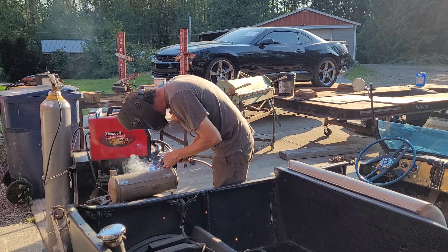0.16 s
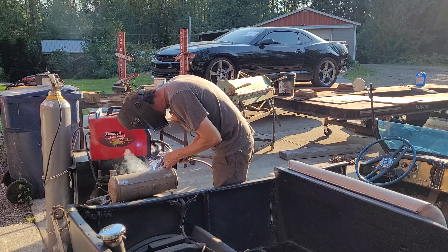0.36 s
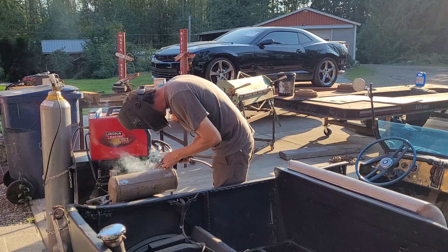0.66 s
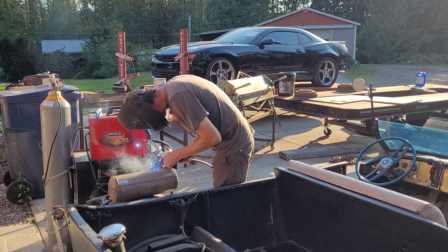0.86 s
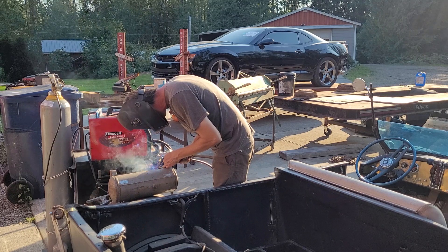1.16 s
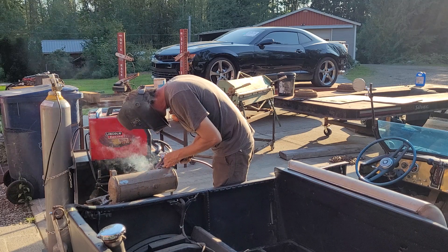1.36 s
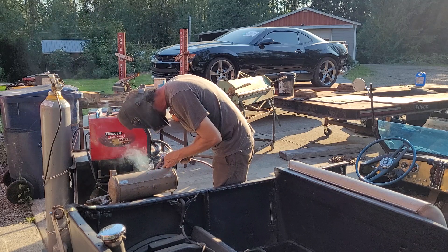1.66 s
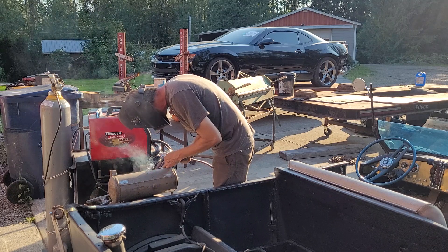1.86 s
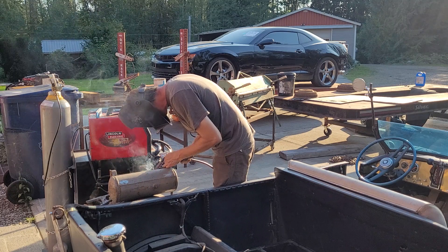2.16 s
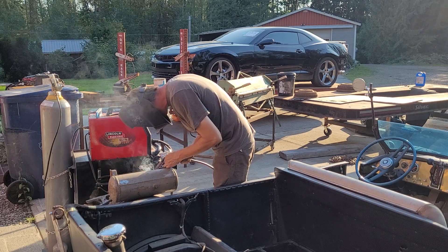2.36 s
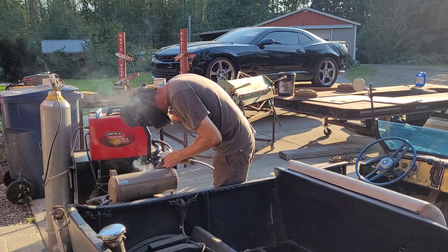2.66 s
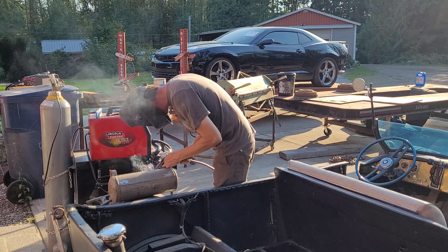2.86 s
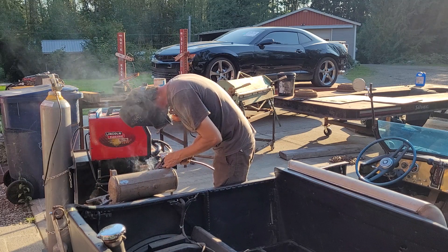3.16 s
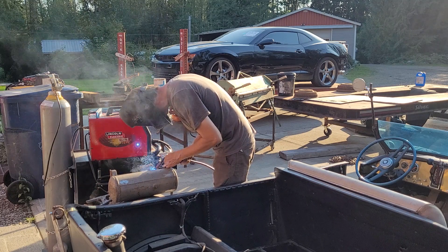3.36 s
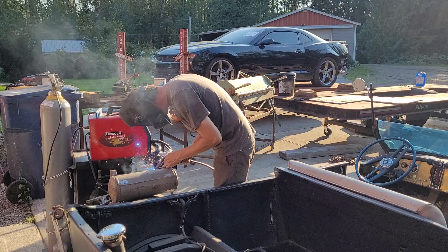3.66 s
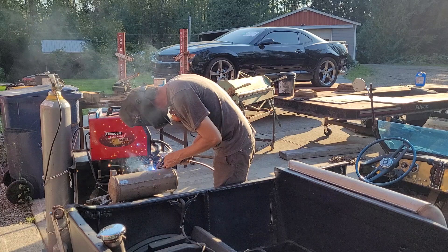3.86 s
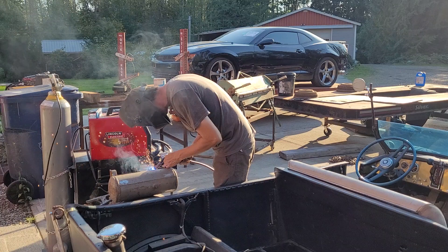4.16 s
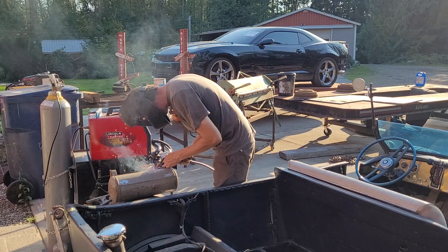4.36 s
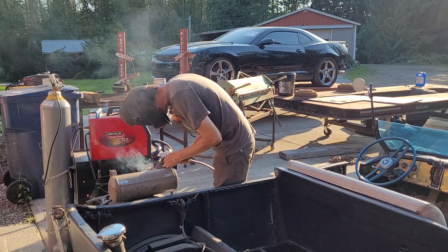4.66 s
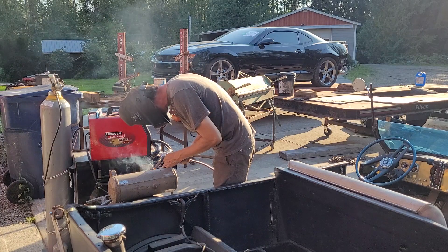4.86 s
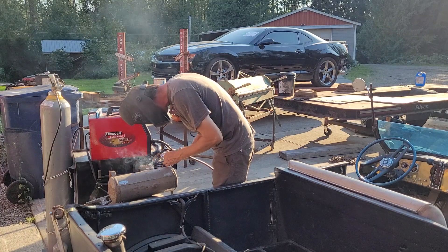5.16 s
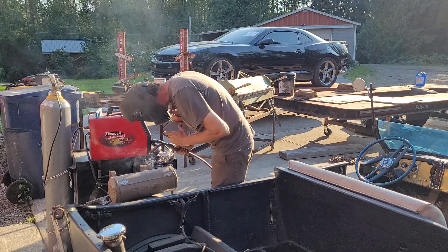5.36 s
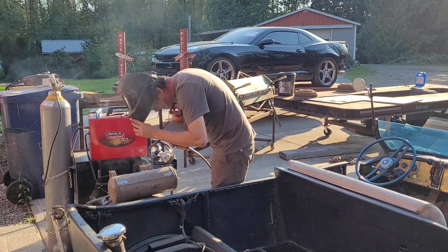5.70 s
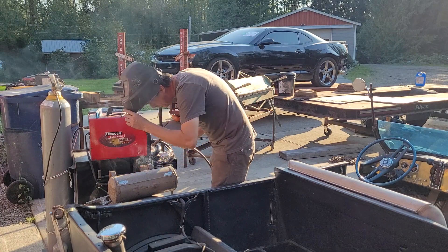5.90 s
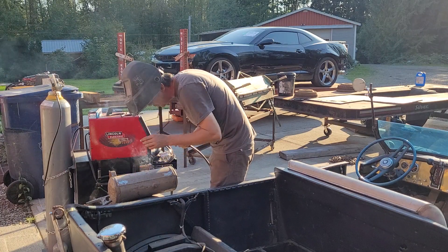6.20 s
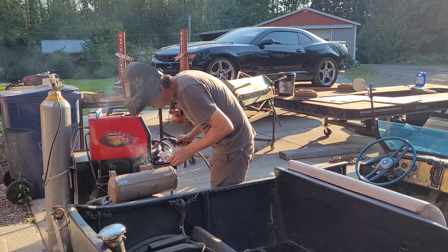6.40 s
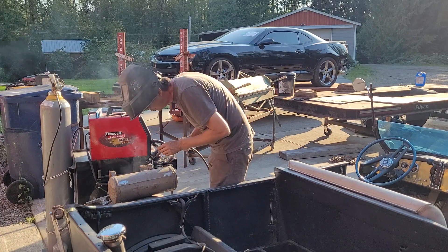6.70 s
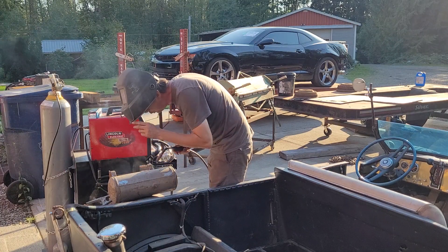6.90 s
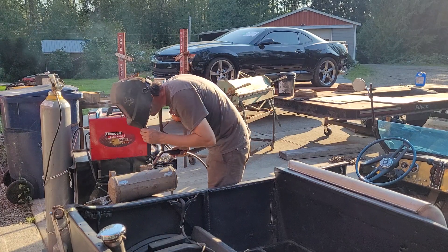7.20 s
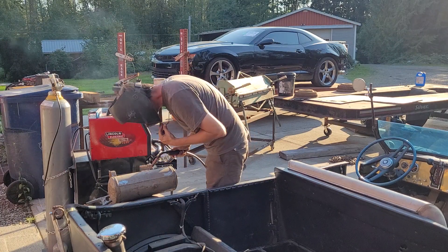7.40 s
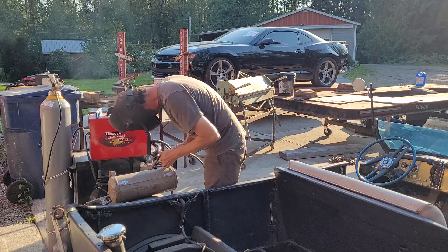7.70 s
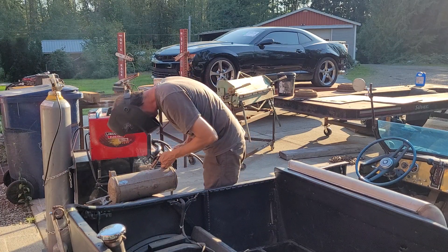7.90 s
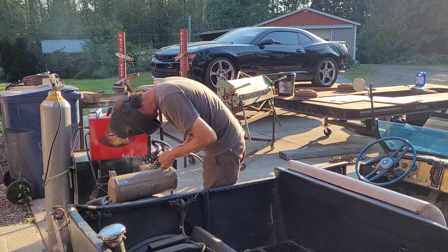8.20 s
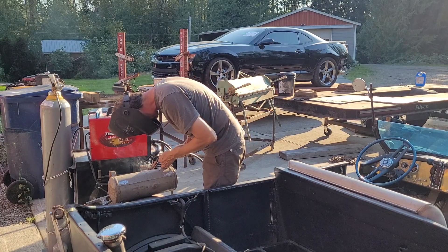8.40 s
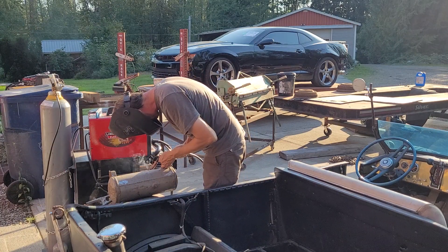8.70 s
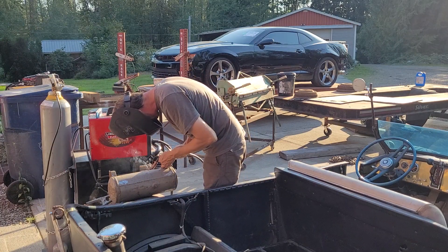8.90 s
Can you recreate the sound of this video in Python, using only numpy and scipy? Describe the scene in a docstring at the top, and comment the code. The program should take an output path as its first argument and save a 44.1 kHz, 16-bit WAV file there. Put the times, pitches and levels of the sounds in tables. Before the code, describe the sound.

Rapid, sharp pops over a bright hiss come from a wire-feed welder working on steel: a short run, a quick tack, then a trigger click and a longer run. A fan hum and a low engine drone continue beneath, with a faint bird in the gap. After the welding, the engine slows and its exhaust swells and eases before a last click. It is heard from nearby, outdoors, with little echo.

```python
"""Wire-feed welding in a yard

Two beads and a short tack on a steel tank: the wire shorts and pops about ninety times a second
over the hiss of the arc; the tank rings and clutter scatters the sound. The trigger clicks the gas
on, and the welder's fan sags as feed motor and arc load the supply. Nearby an engine runs, drops
to idle and booms for a while; a bird calls faintly."""
import sys
import numpy as np
from scipy import signal
from scipy.fft import rfft, irfft
from scipy.io import wavfile

SR = 44100
rng = np.random.default_rng(int(sys.argv[2]) if len(sys.argv) > 2 else 0)


def wav_out(sig):
    """Save sig, one row per channel (or a flat mono array), as 16-bit PCM at SR to the path in sys.argv[1]."""
    wavfile.write(sys.argv[1], SR, np.round(np.clip(np.atleast_2d(sig).T, -1, 1) * 32767).astype(np.int16))


N = 399105
TIME = np.arange(N) / SR

# bead, tack, bead, one curve each: t/s, shorting rate/Hz, pop level/dB, hiss level/dB
WELDS = [
    [(0, 58, -20, -29.5), (.09, 64, -16.5, -33.5), (.18, 89, -20, -33.5), (.29, 74.5, -20.5, -34),
     (.41, 61, -23.5, -40), (.48, 117, -25.5, -34.5), (.65, 108, -18, -42), (.75, 98, -19.5, -34.5),
     (.826, 51.5, -20.5, -44)],
    [(1.232, 84, -19, -31.5), (1.305, 115, -19.5, -27.5)],
    [(3.515, 49.6, -18.5, -25.5), (3.62, 173, -18, -27), (3.69, 61.7, -14, -32), (3.84, 140, -17, -27),
     (3.9, 33.3, -17, -27.5), (3.97, 40.7, -19.5, -31), (4.07, 90, -16.5, -37), (4.2, 92, -16, -32),
     (4.3, 91, -19, -32), (4.37, 114, -22, -32), (4.558, 106, -20.5, -31)],
]
# arc and gas hiss spectrum: f/Hz, relative level/dB
HISS_SPECTRUM = [(100, -12), (1000, -15), (1900, -7), (3200, -6), (4500, 2), (6200, -3), (8700, -5),
                 (11800, 2.5), (13300, 1.5), (15500, 5.5)]
# thump and knock spectrum: f/Hz, relative level/dB
THUMP_SPECTRUM = [(100, -9.5), (300, 0), (650, -15.5), (1000, -3), (1450, 4), (1850, 1), (2400, 0),
                  (3300, -8.5), (6000, -5.5), (15000, -19.5)]
# exhaust boom: t/s, level/dB, centre f/Hz
BOOM = [(0, -65, 144), (2.2, -68.5, 146.4), (4.9, -58, 116.6), (5.5, -53, 124.3), (5.93, -47.5, 130),
        (6.1, -41.5, 143), (6.32, -45, 104.5), (6.58, -38.5, 116), (6.8, -35, 155), (7.3, -31.5, 144),
        (7.67, -40, 141.4), (7.8, -39, 139.3), (8.05, -46, 136.2), (8.45, -48.5, 133), (8.8, -45.5, 140)]
# engine and fan air: t/s, low-band level/dB, high-band level/dB
AIR_LEVELS = [(2.3, -55.5, -81.5), (2.7, -51.5, -76.5), (3.2, -51.5, -76), (4.8, -59, -83),
              (5.3, -59.5, -82), (5.9, -51, -70), (7.1, -50, -68.5), (8.8, -51, -69.5)]


def arc(short_s=0.0028, short_db=-15, hiss_db=-6, flutter_db=1.3):
    """The arc hisses, falls nearly silent while the wire is shorted, then blows free with a pop."""
    times, levels_db = shorts()
    rate_hz, _, hiss_gain = weld_curves()
    next_pop_s = np.append(times, np.inf)[np.searchsorted(times, TIME)]
    shorted = next_pop_s - TIME < short_s
    burn = (hiss_gain + flares()) * from_db(short_db * shorted)
    hiss = burn * from_db(hiss_db + flutter_db * drift(120)) * rng.standard_normal(N)
    pops = impulses(times, levels_db)
    body = thumps(times, levels_db) + cold_strike(pops, rate_hz == 0) + tank(pops)
    return cracks(pops) + body + colour(hiss, HISS_SPECTRUM)


def shorts(overdue_beats=0.35, jitter_beats=0.06, spread_db=1.5):
    """Pop times and levels: the wire dips steadily; each loud pop comes late and restarts the beat."""
    # wire strikes, or stubs and blows free: t/s, level/dB
    loud_pops = [(0.0023, -14), (0.0224, -13.5), (0.0378, -14), (0.055, -17.5), (0.0701, -14.5),
                 (0.09, -13), (0.1078, -13.5), (0.3057, -15.5), (0.338, -16.5), (0.3534, -18),
                 (0.384, -17.5), (0.602, -13), (0.6308, -17.5), (0.65, -17), (0.803, -14), (0.8233, -16),
                 (1.0074, -23), (1.0681, -21.5), (1.2331, -12.5), (1.2484, -9), (1.2694, -12.5),
                 (1.2891, -14.5), (1.2984, -11.5), (3.3764, -13), (3.516, -13.5), (3.553, -19),
                 (3.672, -13), (3.7142, -11.5), (3.7422, -12), (3.7612, -12), (3.8027, -14.5), (3.868, -18),
                 (3.8991, -12.5), (3.9165, -10.5), (3.9498, -11), (3.986, -12.5), (4.0064, -10.5),
                 (4.0248, -15), (4.0529, -13), (4.1692, -17), (4.1803, -15), (4.2255, -13), (4.2359, -14),
                 (4.2484, -14), (4.2655, -16.5), (4.2842, -11.5), (4.3075, -14), (4.326, -13),
                 (4.4096, -15), (4.5543, -14.5)]
    loud_s, loud_db = np.transpose(loud_pops)
    rate_hz, pop_db, _ = weld_curves()
    dips = np.cumsum(rate_hz) / SR
    restarts = np.interp(loud_s, TIME, dips)
    beats = np.concatenate([np.linspace(a, b, max(round(b - a), 1) + 1)[1:-1]
                            for a, b in zip(restarts, restarts[1:] - overdue_beats)])
    late, strong = rng.standard_normal((N // 100, 2))[:len(beats)].T
    beat_s = np.interp(beats + jitter_beats * late, dips, TIME)
    times = np.append(loud_s, beat_s)
    levels_db = np.append(loud_db, np.interp(beat_s, TIME, pop_db) + spread_db * strong)
    return np.sort(times), levels_db[np.argsort(times)]


def weld_curves():
    """Shorting rate, pop level and hiss gain per sample; no shorts or hiss between welds."""
    rate_hz, pop_db, hiss_db = in_time(np.vstack(WELDS))
    burning = sum(during(weld) for weld in WELDS)
    return rate_hz * burning, pop_db, from_db(hiss_db) * burning


def during(weld):
    """1 while this weld burns, else 0."""
    return (TIME >= weld[0][0]) * (TIME < weld[-1][0])


def cracks(pops, gain_db=10.5, tear_db=-3.5, tear_s=0.00044):
    """Each short blows free with a sharp crack and a ragged tear of spatter."""
    # f/Hz, relative level/dB
    crack_spectrum = [(100, -44.5), (1400, -31.5), (3300, -6.5), (4400, 2.5), (7200, 2), (9200, -3.5),
                      (10500, 1), (11700, 7), (13500, 0.5), (15500, 5.5)]
    tear = from_db(tear_db) * np.sqrt(lagging(pops ** 2 + 1e-18, tear_s, 0)) * rng.standard_normal(N)
    return colour(from_db(gain_db) * (pops + tear), crack_spectrum)


def thumps(times, levels_db, pivot_db=-15, slope=0.73):
    """A dull thump under each pop; harder pops gain less thump than crack."""
    # t/s, gain/dB
    thump_gain = [(0.8, -1.5), (1.23, 2.5), (3.9, -0.5), (4.15, -2.5), (4.55, 1)]
    # dull spits of molten metal: t/s, level/dB
    spits = [(0.1209, -14.5), (4.5345, -13)]
    hits = impulses(times, pivot_db + slope * (levels_db - pivot_db)) * from_db(in_time(thump_gain)[0])
    return colour(hits + impulses(*np.transpose(spits)), THUMP_SPECTRUM)


def cold_strike(pops, idle, gain_db=-7.5, warm_up_s=0.31):
    """Pops on cold metal have more body until the pool warms up."""
    # f/Hz, relative level/dB
    strike_spectrum = [(90, -7), (240, 6), (420, -6.5), (650, 9), (1000, 1.5), (1900, 2), (3200, -17.5),
                       (15000, -39)]
    cold = lagging(idle, warm_up_s, 0)
    return colour(from_db(gain_db) * cold * pops, strike_spectrum)


def flares(ramp_s=0.0128):
    """Hiss gain of the arc burning openly, without shorting."""
    # t/s, length/s, level/dB
    open_burns = [(0.828, 0.041, -37.5), (0.896, 0.12, -43), (1.204, 0.021, -35), (3.378, 0.042, -25),
                  (3.42, 0.15, -41.5)]
    return sum(from_db(db) * np.clip(np.minimum(TIME - s, s + length_s - TIME) / ramp_s + 0.5, 0, 1)
               for s, length_s, db in open_burns)


def tank(pops):
    """Every pop rings the modes of the steel tank."""
    # f/Hz, level/dB, t60/s
    modes = [(1012, -37.5, 0.073), (2885, -40.5, 0.06)]
    t = TIME[:SR // 4]
    ring = sum(from_db(db - 60 * t / t60_s) * np.sin(2 * np.pi * hz * t) for hz, db, t60_s in modes)
    return convolve(pops, ring)


def clicks(snap_t60_s=0.011, knock_t60_s=0.047, ring_t60_s=0.01):
    """Trigger, gas valve and torch knocks: a bright snap, a dull knock and the struck part's ring."""
    # t/s, snap level/dB, ring level/dB, ring f/Hz
    hits = [(3.2156, -11, -35.5, 1320), (3.229, -15, -34.5, 1282), (5.631, -72, -47.5, 1993),
            (7.11, -55, -43, 1489), (8.928, -11, -41, 1300), (8.943, -13.5, -34, 1270)]
    # f/Hz, relative level/dB
    snap_spectrum = [(1000, -44), (5000, -15), (10000, -15), (14500, 4), (16000, 5)]
    t, out = TIME[:SR // 5], 0
    for s, snap_db, ring_db, hz in hits:
        snap = rng.standard_normal(len(t)) * from_db(snap_db - 12 - 60 * t / snap_t60_s)
        knock = rng.standard_normal(len(t)) * from_db(ring_db - 11 - 60 * t / knock_t60_s)
        ring = from_db(ring_db - 60 * t / ring_t60_s) * np.sin(2 * np.pi * hz * t)
        click = (colour(snap, snap_spectrum) + colour(knock, THUMP_SPECTRUM))[0, :len(t)] + ring
        out = out + np.pad(click, (round(s * SR), N))[:N]
    return out


def gas_and_feed(gas_db=-62, feed_db=-53.5):
    """Shielding gas hisses and the feed motor whirrs while the trigger is held."""
    # f/Hz, relative level/dB
    motor_spectrum = [(60, -19), (190, 1.5), (290, 8.5), (430, -9), (640, -4), (1200, -14.5),
                      (15000, -31.5)]
    gas = from_db(gas_db) * colour(rng.standard_normal(N), HISS_SPECTRUM)
    motor = from_db(feed_db) * colour(rng.standard_normal(N), motor_spectrum)
    return trigger() * (gas + motor)


def trigger(ramp_s=0.02):
    """1 while the trigger is held, else 0."""
    # on/s, off/s
    held = [(0, 1.4), (3.223, 4.6), (8.935, 10)]
    return sum(np.clip(np.minimum(TIME - on, off - TIME) / ramp_s, 0, 1) for on, off in held)


def fan(blade_hz=256.1, inertia_s=0.1111, feed_sag_hz=14, flutter_db=1.5, blur_rad=0.22):
    """Blade-pass tones follow the air rush; load slows and dulls them, the arc makes them unsteady."""
    # blade-pass drop per weld: f/Hz
    arc_sag_hz = [11, 19.29, 20.95]
    # harmonic number, level/dB
    tones = [(1, 2), (2, -0.5), (3, -8)]
    sag_hz = feed_sag_hz * trigger() + sum(hz * during(weld) for hz, weld in zip(arc_sag_hz, WELDS))
    sag_hz = lagging(sag_hz, inertia_s, feed_sag_hz)
    load = np.minimum(sag_hz / feed_sag_hz, 1)
    arcing = np.clip(sag_hz / feed_sag_hz - 1, 0, 1)
    level_db = in_time(AIR_LEVELS)[0] - 2 * arcing
    wander = 1 + 0.001816 * drift(11) + 0.04 * arcing * drift(25.02)
    phase = 2 * np.pi * np.cumsum((blade_hz - sag_hz) * wander) / SR
    out = 0
    for k, tone_db in tones:
        gain = from_db(level_db + tone_db - 7 * load * (k > 1) + flutter_db * drift(23))
        turbulence_rad = blur_rad * (k - 1) ** 2 * drift(20)
        out += gain * np.sin(k * phase + turbulence_rad)
    return np.sqrt(2) * out


def engine(throb_db=1.5, rough_db=2.2, boom_width=0.17, smear_rad=0.41, right_lag_rad=0.57):
    """Two firings a turn give the deep tone; higher crank orders chug through a moving resonance."""
    # t/s, firing f/Hz
    speed = [(0, 70.7), (4.66, 70.6), (4.95, 55.1), (6.1, 57.77), (6.9, 55.85), (9.05, 55.44)]
    # t/s, level/dB
    firing_level = [(0.0, -53), (1.85, -60.5), (1.97, -52.5), (2.47, -62.5), (2.65, -46.5), (3.5, -41),
                    (3.53, -48.5), (4.96, -46), (5.25, -51.5), (6.18, -35.5), (7.64, -40.5), (7.71, -48),
                    (8.77, -33.5)]
    # f/Hz, relative level/dB
    exhaust_spectrum = [(84, 11.5), (112, 3), (140, 1), (168, -0.5), (198, -7.5), (260, -2.5), (335, 6)]
    firing_hz, = in_time(speed)
    firing_db, = in_time(firing_level)
    boom_db, boom_hz = in_time(BOOM)
    crank_rad = np.pi * np.cumsum(firing_hz * (1 + 0.0035 * drift(6.4))) / SR
    lumpy = np.interp(boom_db, [-44, max(boom_db)], [1, 0.3])  # firms up when loud
    orders = np.arange(3, 14)
    order_hz = orders[:, None] * firing_hz / 2
    detuning = np.log(order_hz / boom_hz) / boom_width
    weights = from_db(at_hz(exhaust_spectrum, order_hz)) / (1 + detuning ** 2)
    weights /= np.linalg.norm(weights, axis=0)
    boom = 0
    for k, weight in zip(orders, weights):
        phase = k * crank_rad - smear_rad * k * k  # pipe delay differs by order, rounding the chug
        boom += weight * from_db(rough_db * lumpy * drift(12)) * np.exp(1j * phase)
    boom *= from_db(boom_db + throb_db * lumpy * drift(14.5))
    firing = from_db(firing_db + throb_db * lumpy * drift(11)) * np.exp(2j * crank_rad)
    left, right = firing + boom * lean_left(0.5)
    return np.sqrt(2) * np.real([left, right * np.exp(-1j * right_lag_rad)])


def rumble():
    """Turbulent exhaust gas, growing with the boom."""
    level_db = -53 + 0.57 * (in_time(BOOM)[0] + 44)
    return from_db(level_db) * band_noise(hz=118, width_hz=130)


def air_rush(low_gain_db=0.5, high_gain_db=5, flutter_db=0.85):
    """Broad noise of engine and fan air, in two bands."""
    # both: f/Hz, relative level/dB
    low_spectrum = [(25, -9.5), (60, 9), (120, -12.5), (200, -0.5), (380, 1), (600, -2.5), (900, -4),
                    (1400, -12), (2200, -20), (3100, -43), (5500, -34.5), (15000, -43)]
    high_spectrum = [(25, -27.5), (800, -2), (1900, 8.5), (2900, 4), (3900, 2.5), (4600, -1.5),
                     (6400, -5.5), (7800, -16.5), (10000, -27.5), (11800, -13), (14000, -29.5)]
    low_db, high_db = in_time(AIR_LEVELS)
    low = from_db(low_db + low_gain_db + flutter_db * drift(30.2)) * diffuse_noise(low_spectrum)
    return low + from_db(high_db + high_gain_db) * diffuse_noise(high_spectrum)


def scrape(peak_s=7.06, fade_s=0.16, level_db=-61.5):
    """A soft swell of friction noise as the work is handled."""
    swell = np.exp(-np.abs(TIME - peak_s) / fade_s)
    return from_db(level_db) * swell * band_noise(hz=3600, width_hz=1900)


def bird():
    """Thin falling whistles with a quick waver."""
    # t/s, length/s, start f/Hz, end f/Hz, level/dB
    notes = [(2.736, 0.046, 7250, 6650, -70), (2.788, 0.056, 7000, 6500, -72),
             (2.906, 0.062, 6600, 6030, -70.5), (2.962, 0.047, 6360, 5900, -70)]
    out, waver = np.zeros(N), 1 + 0.035 * drift(163.6)
    for s, length_s, start_hz, end_hz, db in notes:
        along = np.clip((TIME - s) / length_s, 0, 1)
        hz = (start_hz + (end_hz - start_hz) * along) * waver
        out += from_db(db) * np.sin(np.pi * along) * np.sin(2 * np.pi * np.cumsum(hz) / SR)
    return out


def yard(x, scatter_db=1.5, scatter_t60_s=0.11, tail_db=-21, tail_t60_s=0.76, size=SR // 2):
    """Direct sound, near echoes, bright scatter off the clutter and a dull far tail."""
    # delay/s, level/dB
    reflections = [(.00031, -11), (.00098, -15), (.00215, -3.1)]
    t = TIME[:size]
    echoes = impulses(*np.transpose(reflections))[:size]
    bright = signal.lfilter(*signal.butter(1, 2200, "high", fs=SR), rng.standard_normal((5, 2, size)))
    dull = signal.lfilter(*signal.butter(1, 6000, fs=SR), rng.standard_normal((2, size)))
    paths = from_db(scatter_db) * unit_rms(bright * from_db(-60 * t / scatter_t60_s)) / np.sqrt(size)
    tail = from_db(tail_db) * unit_rms(dull * from_db(-60 * t / tail_t60_s)) / np.sqrt(size)
    # torch movement shifts the scatter between paths
    shares = np.array([drift(12) for _ in paths])
    shares /= np.linalg.norm(shares, axis=0)
    scatter = sum(convolve(x * share, path) for share, path in zip(shares, paths))
    # the arc dances behind the nozzle, trading direct for reflected sound
    shade = from_db(1.4 * drift(60))
    direct = from_left(np.ravel(x) * shade, 4)
    reflected = convolve(x / shade, from_left(echoes, 4) + tail)
    return (direct + reflected + scatter) * lean_left(1.22)


def diffuse_noise(spectrum):
    """Stereo noise, mostly from the left: alike in the bass, unrelated in the treble."""
    # f/Hz, left-right correlation
    correlation = [(100, 0.96), (300, 0.96), (600, 0.53), (1200, 0.054), (3000, 0.11), (12000, 0.037)]
    alike = np.clip(at_hz(correlation, np.fft.rfftfreq(N, 1 / SR)), 0, 1)
    split = np.sqrt([alike, 1 - alike, 1 - alike])
    common, left, right = np.sqrt(2) * irfft(rfft(rng.standard_normal((3, N))) * split, N)
    return colour(from_left(common, 8) + np.array([left, right]), spectrum)


def band_noise(hz, width_hz):
    """Noise through the same resonance twice, unit rms."""
    r = np.exp(-np.pi * width_hz / SR)
    b, a = [1, 0, -1], [1, -2 * r * np.cos(2 * np.pi * hz / SR), r * r]
    return unit_rms(signal.lfilter(b, a, signal.lfilter(b, a, rng.standard_normal(N))))


def drift(rate_hz, hop=40, settle=2000):
    """Slow random curve, unit rms."""
    r = np.exp(-2 * np.pi * hop * rate_hz / SR)
    slow = signal.lfilter([1], [1, -2 * r, r * r], rng.standard_normal(N // hop + settle + 2))[settle:]
    return np.interp(np.arange(N) / hop, np.arange(len(slow)), unit_rms(slow))


def colour(x, spectrum, size=4096):
    """Minimum-phase filter of unit energy with the given spectrum."""
    cepstrum = irfft(np.log(from_db(at_hz(spectrum, np.fft.rfftfreq(size, 1 / SR)))))
    cepstrum[1:size // 2] *= 2
    cepstrum[size // 2 + 1:] = 0
    response = irfft(np.exp(rfft(cepstrum)))
    return convolve(x, response / np.linalg.norm(response))


def convolve(x, response):
    """Convolve per channel, at most N samples."""
    return signal.fftconvolve(np.atleast_2d(x), np.atleast_2d(response), axes=-1)[:, :N]


def impulses(times, db):
    """One impulse at each time."""
    out = np.zeros(N)
    np.add.at(out, np.clip(np.round(np.asarray(times) * SR).astype(int), 0, N - 1), from_db(db))
    return out


def lagging(x, tau_s, start):
    """First-order lag from a starting value."""
    keep = np.exp(-1 / (tau_s * SR))
    return signal.lfilter([1 - keep], [1, -keep], x, zi=[start])[0]


def in_time(rows):
    """Each column of a curve at every sample."""
    s, *columns = np.transpose(rows)
    return [np.interp(TIME, s, column) for column in columns]


def at_hz(points, hz):
    """Interpolate a spectrum over log frequency."""
    f, value = np.transpose(points)
    return np.interp(np.log(hz + 1), np.log(f), value)


def from_left(x, lag_samples):
    """Stereo pair, right channel delayed."""
    return np.array([x, np.pad(x, (lag_samples, 0))[:len(x)]])


def lean_left(db):
    """Stereo gains: left up, right down."""
    return from_db([[db], [-db]])


def from_db(db):
    """Decibels to gain."""
    return 10 ** (np.asarray(db) / 20)


def unit_rms(x):
    """Scale to unit rms."""
    return x / np.sqrt(np.mean(x ** 2) + 1e-20)


def scene():
    """Work sounds and bird pass through the yard; the machines drone underneath."""
    foreground = yard(arc() + clicks() + gas_and_feed() + scrape() + bird())
    cooling = from_left(fan(), 12) * lean_left(1)
    return foreground + cooling + engine() + rumble() + air_rush()


def record(dry):
    """Steep low-pass."""
    cutoff_hz = 15720
    return signal.sosfilt(signal.ellip(10, 0.2, 80, cutoff_hz, fs=SR, output="sos"), dry)


dry = scene()
out = record(dry)
wav_out(out)
```